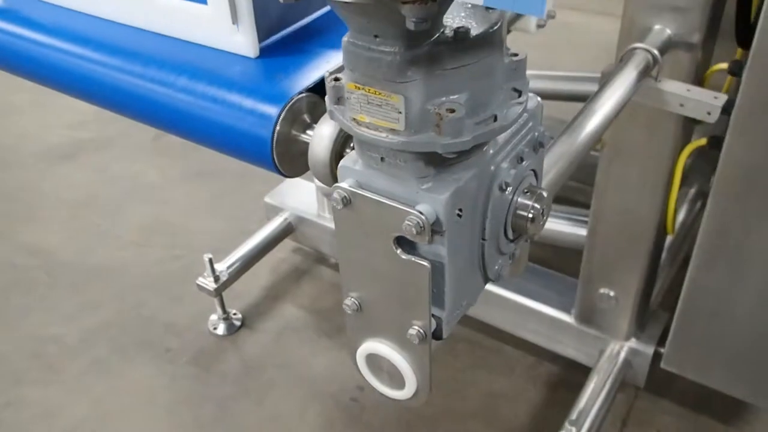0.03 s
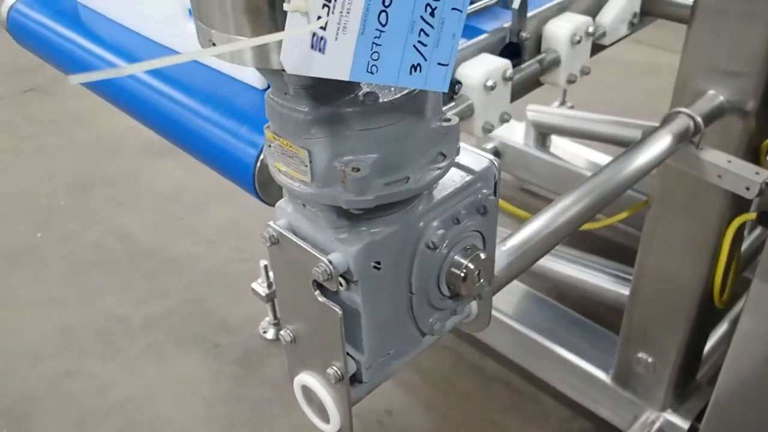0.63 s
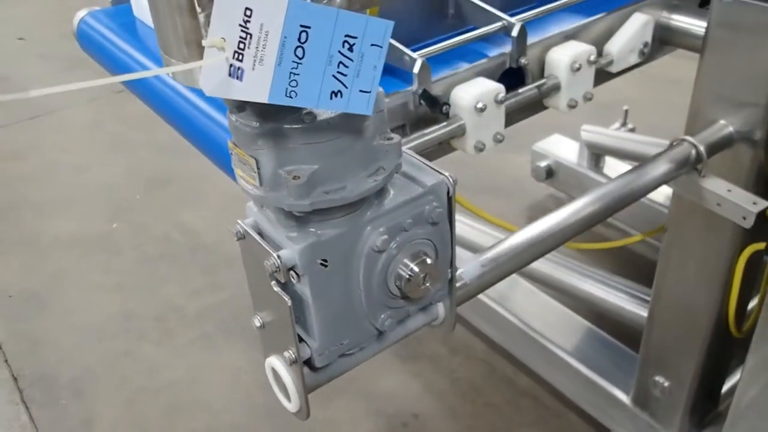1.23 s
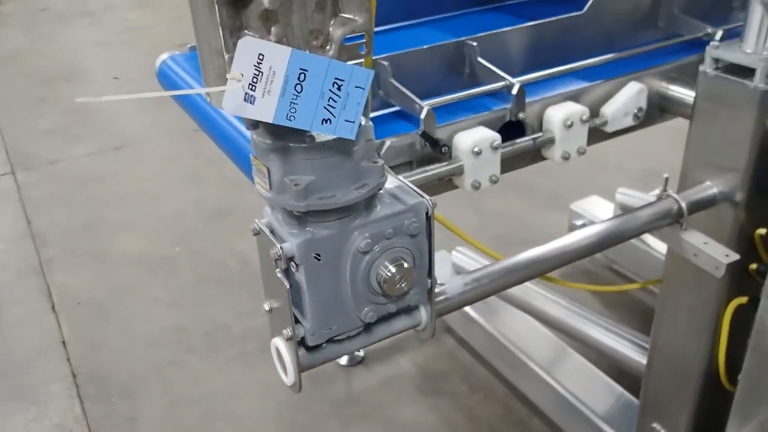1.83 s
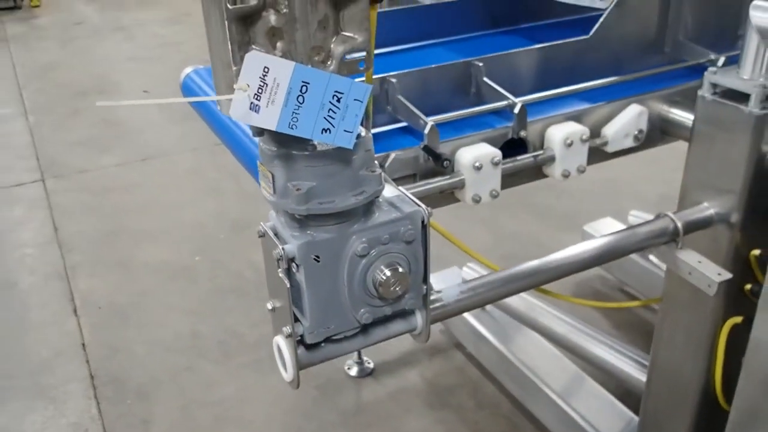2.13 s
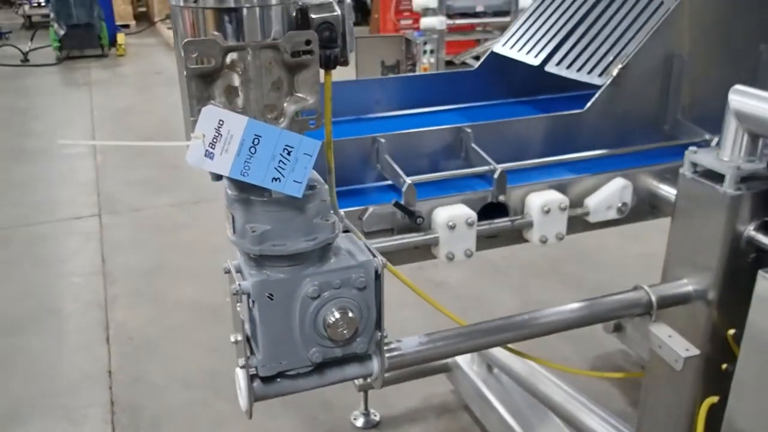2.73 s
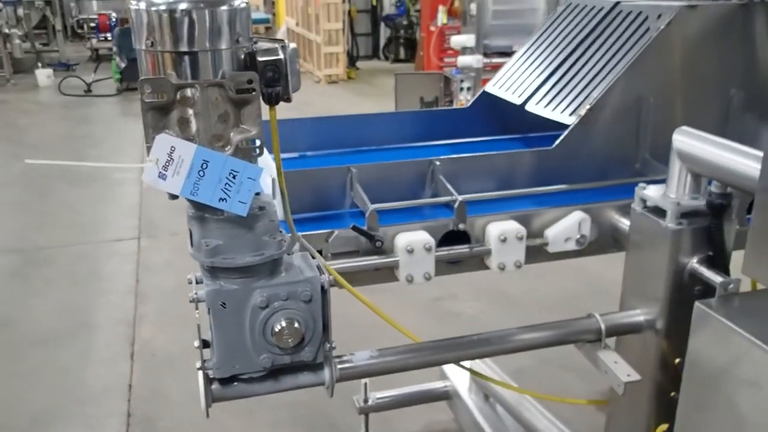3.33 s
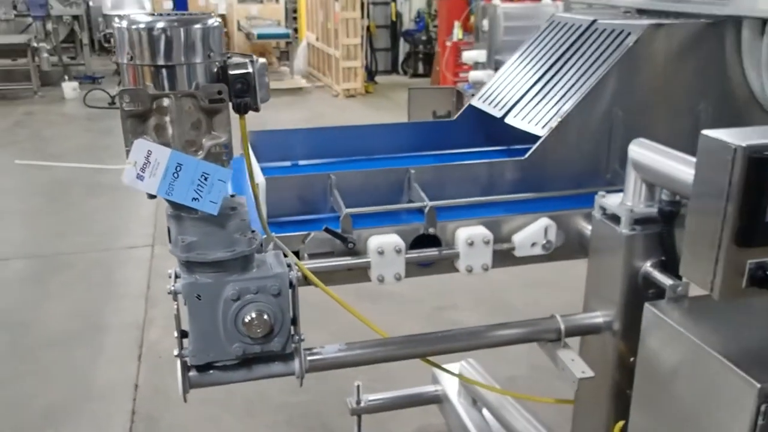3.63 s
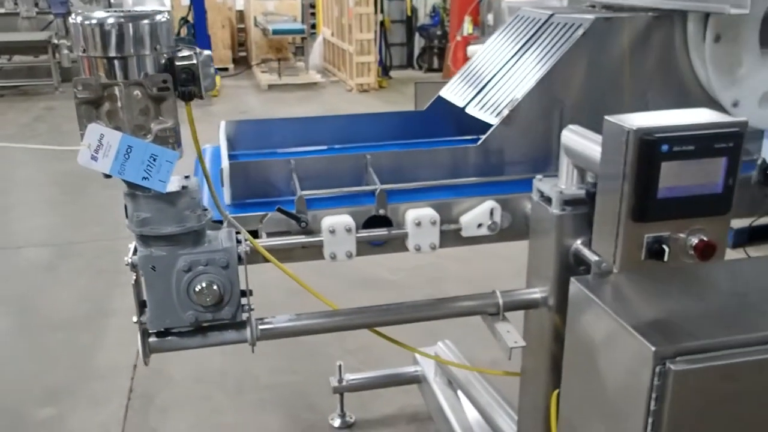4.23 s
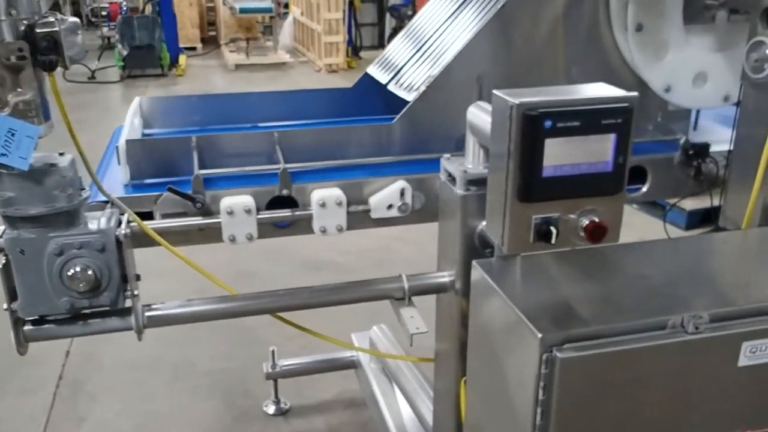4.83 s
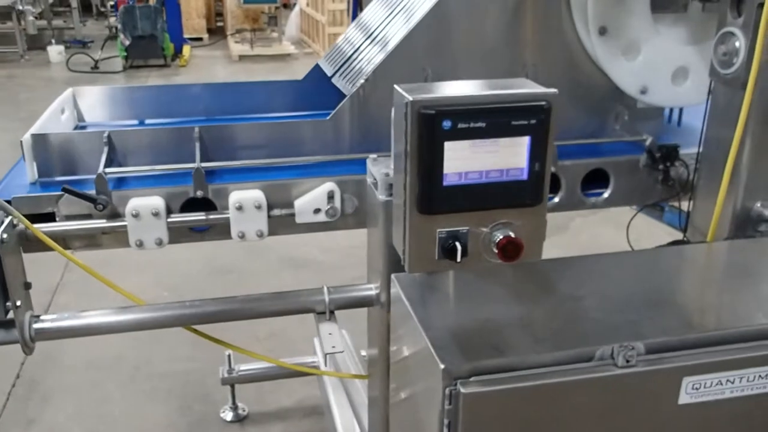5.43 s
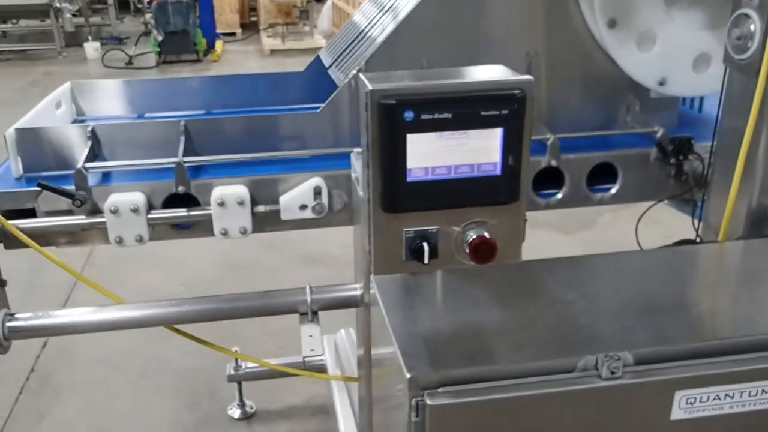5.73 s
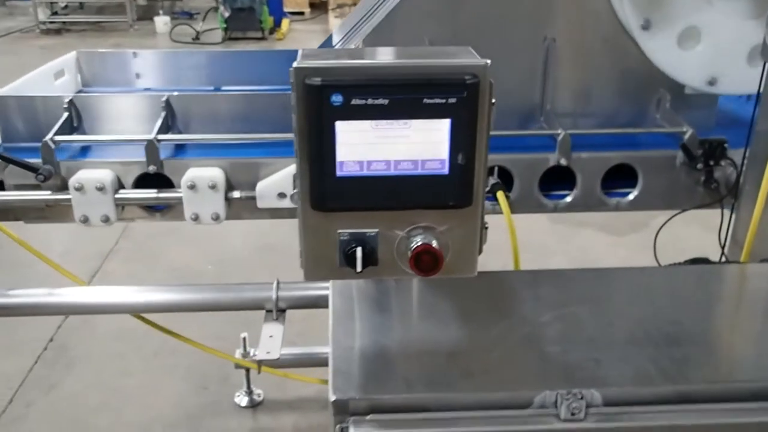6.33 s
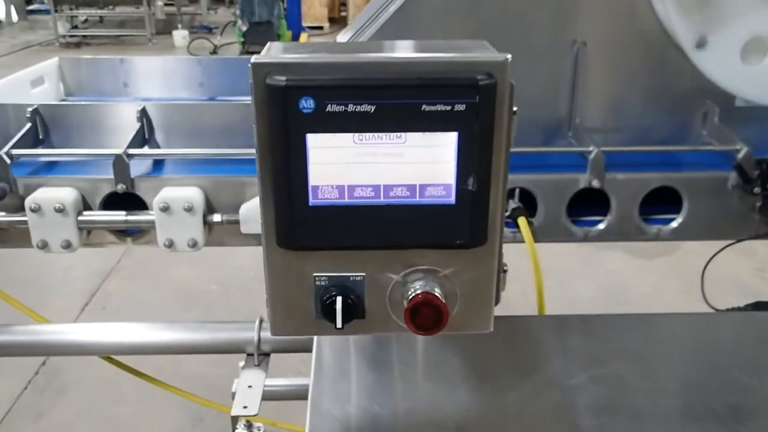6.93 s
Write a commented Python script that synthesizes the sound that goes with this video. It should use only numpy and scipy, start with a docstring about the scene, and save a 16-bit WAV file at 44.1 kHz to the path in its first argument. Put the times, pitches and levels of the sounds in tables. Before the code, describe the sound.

A conveyor runs steadily in a warehouse. Its gear motor gives a low hum and rumble, a rhythmic churn and rattle, a thin high whine and a soft fan hiss, while a bearing squeals faintly. The hand-held stereo microphone starts close and backs away, so the whine and rattle ease while the hum carries on. The belt softly brushes its guide three times, and a finger briefly scuffs the microphone.

```python
"""A warehouse, beside a running conveyor: a hand-held stereo microphone backs from 0.37 m to about 1 m
off the gear motor and turns away. The inverter makes the windings whine near 8 kHz, shafts hum, the
gearing churns and rattles with every turn, a bearing sings, the fan hisses and loose fittings buzz.
The belt brushes a guide once per turn of its roller; a finger scuffs the recorder. Distance fades the
whine and the rattle; the hum swells and sinks with the standing waves of the hall."""
import sys
import numpy as np
from scipy import signal
from scipy.fft import rfft, irfft
from scipy.io import wavfile
from scipy.ndimage import map_coordinates

SR = 44100
rng = np.random.default_rng(int(sys.argv[2]) if len(sys.argv) > 2 else 0)


def log_audio(samples):
    """Write samples as a 16-bit WAV file to the path given in sys.argv[1]."""
    # one column per channel
    frames = np.atleast_2d(samples).T
    # limit to full scale, then quantise
    limited = np.clip(frames, -1, 1)
    pcm = np.round(limited * 32767).astype(np.int16)
    wavfile.write(sys.argv[1], SR, pcm)


N = 311787
T = np.arange(N) / SR
TURN_HZ = 4.385  # turns of the gearing per second


def from_db(db):
    """Decibels to gain."""
    return 10 ** (np.asarray(db) / 20)


def unit(x):
    """Scales to rms 1."""
    return x / np.sqrt(np.mean(abs(x) ** 2) + 1e-20)


def curve(rows, t=T):
    """Joins (time, value) rows with straight lines."""
    return np.interp(t, *np.transpose(rows))


def over_hz(points):
    """A short spectrum read at every FFT bin."""
    hz, value = np.transpose(points)
    return np.interp(np.log(np.fft.rfftfreq(N, 1 / SR) + 1), np.log(hz), value)


def drift(rate_hz):
    """A smooth random wander of rms 1."""
    steps = rng.standard_normal(400)
    places = np.linspace(0, 14 * rate_hz, N // 100 + 1)
    return unit(map_coordinates(steps, [places], mode="wrap"))[np.arange(N) // 100]


def tone(hz, rough, waver_hz, wander_hz=0):
    """A sine whose strength and phase waver and whose pitch may wander."""
    waver = 1 + rough * (drift(waver_hz) + 1j * drift(waver_hz))
    turns = np.cumsum(hz + wander_hz * drift(waver_hz)) / SR
    return unit((waver * np.exp(2j * np.pi * (turns + rng.random()))).real)


# How alike the two capsules hear the hall: f/Hz, likeness/0-1
STEREO_LIKENESS = [(50, 0.94), (150, 0.97), (280, 1), (550, 0.97), (900, .99), (2000, .96), (3000, 0.98),
                   (6000, 0.59), (9000, 0.06), (15000, 0.22)]

def colour(x, spectrum):
    """Shapes an excitation to rms 1 across two capsules that differ more in the treble."""
    same = np.clip(over_hz(STEREO_LIKENESS), 0, 1)
    mid = rfft(unit(x)) * np.sqrt(1 + same)
    side = rfft(rng.standard_normal(N)) * np.sqrt(1 - same)
    return unit(irfft(np.array([mid + side, mid - side]) * from_db(over_hz(spectrum)), N))


def hiss(spectrum):
    """Coloured stereo noise."""
    return colour(rng.standard_normal(N), spectrum)


# The microphone's walk: t/s, speed away from the motor/(m/s)
WALK = [(0, 0.23), (.4, -0.077), (.8, 0.025), (1.2, .26), (1.55, 0.31), (2, 0.18), (2.4, 0.095), (3, 0.22),
        (3.55, .34), (4, 0.079), (4.5, -0.043), (5.1, -0.092), (5.8, 0.021), (6.4, -0.27), (7.07, -0.25)]

def receded_db(start_m=0.37):
    """The microphone's distance from the motor, in dB over its starting distance."""
    metres = start_m + np.cumsum(curve(WALK)) / SR
    return 20 * np.log10(np.maximum(metres / start_m, .5))


def heard_walking(hz, wet_db, start_turns, sway_m_s=.08, shimmer=0.55, slant_rad=0.2, count=10):
    """A high tone at the moving microphone: direct sound plus echoes, each with its own Doppler shift."""
    t = T[::100]
    away_m = np.cumsum(curve(WALK, t)) * t[1]
    phase_per_m = 2j * np.pi * hz / 343
    ahead, aside, phase, bearing = rng.uniform(-1, 1, (4, count, 1))
    echoes = np.exp(phase_per_m * (ahead * away_m + aside * sway_m_s * t) + 1j * np.pi * phase)
    wet = from_db(wet_db)
    pair = []
    for side in (-1, 1):
        direct = np.exp(-phase_per_m * away_m + 1j * side * slant_rad)  # reaches one capsule earlier
        room = (echoes * np.exp(side * 1.7j * bearing)).sum(0) / np.sqrt(count)
        scatter = shimmer * (drift(14) + 1j * drift(12))[::100]  # echoes off moving parts blur the line
        pair.append(direct + wet * (room + scatter))
    power = 1 + wet ** 2 * (1 + 2 * shimmer ** 2)
    pair = unit(np.array(pair) / np.sqrt(power))  # more echo leaves the mean level unchanged
    wave = np.exp(2j * np.pi * (hz * T + start_turns))
    return np.sqrt(2) * np.array([(np.interp(T, t, path) * wave).real for path in pair])


# A second inverter, farther off in the hall: f/Hz, level/dB
FAR_WHINE = [(7973, -47), (8036, -47.5), (8070, -55)]

def far_inverter():
    """Faint lines that arrive with about as much echo as direct sound."""
    return sum(from_db(db) * heard_walking(hz, wet_db=-3, start_turns=rng.random())
               for hz, db in FAR_WHINE)


# Four families of sidebands from the near motor, each a list of:
# multiple of the carrier, of the drive frequency, of the rotor slot rate, level in the family/dB
SIDEBANDS = [
    [(1, -3, 0, -11), (1, -1, 0, -9), (1, 1, 0, -12), (1, 3, 0, -3), (1, 5, 0, -8), (1, -1, 1, -15)],
    [(2, -6, 0, -26), (2, -4, 0, -17), (2, -2, 0, -7), (2, 0, 0, -3), (2, 2, 0, -6), (2, 4, 0, -18),
     (2, 6, 0, -29)],
    [(2, -2, -1, -13), (2, 0, -1, -6), (2, 2, -1, -2), (2, -2, 1, -4), (2, 0, 1, -7), (2, 2, 1, -13)],
    [(3, -1, -1, -11), (3, -9, 0, -17), (3, -3, 0, -7), (3, -1, 0, -12), (3, 1, 0, -12), (3, 3, 0, -3),
     (3, 9, 0, -15), (3, 1, 1, -13)],
]
# How each family carries to the microphone:
# starting level/dB, fall with distance (1 = free field), change when turned away/dB, flicker/dB
WHINE_CARRY = [(-53, 0.78, 3, 2.5), (-28.5, 0.87, -3, 1.4), (-43, 0.72, -5.5, 1.2), (-53, 0.66, -2.5, 0.8)]
# The microphone crosses each family's beam from the housing: t/s, half width/s, gain/dB
WHINE_BEAMS = [(0.71, 0.22, 6), (0.025, 0.28, 7), (.03, 0.31, 0.5), (0.61, 0.14, 3)]
# The microphone's aim: t/s, turned away from the motor/0-1
TURNED_AWAY = [(0, 0), (3.3, 0), (5.2, 0.8), (7.07, 0.74)]

def motor_whine(carrier_hz=4000, drive_hz=27, slot_hz=386.5, lag_turns=.09, flicker_hz=3.3):
    """The inverter's sidebands keep in step and pulse at twice the drive rate; slot lines run free."""
    away_db, turned = receded_db(), curve(TURNED_AWAY)
    wet_db = (-10 + .9 * away_db + 3 * turned)[::100]  # echoes gain on the direct sound
    out = 0
    for family, carry, (s, width_s, beam_db) in zip(SIDEBANDS, WHINE_CARRY, WHINE_BEAMS):
        near_db, fall, turned_db, flicker_db = carry
        start, lines = rng.random(), 0
        for carrier, drive, slot, db in family:
            hz = carrier * carrier_hz + drive * drive_hz + slot * slot_hz
            lag = lag_turns * (drive / 2) ** 2  # the housing delays outer sidebands: softer pulses
            lines += from_db(db) * heard_walking(hz, wet_db, start + lag + slot * rng.random())
        beam = beam_db * np.exp(-((T - s) / width_s) ** 2)
        level_db = near_db - fall * away_db + turned_db * turned + beam
        out += lines * from_db(level_db + flicker_db * drift(flicker_hz))
    return out


# Weaker shaft and gear tones, alike at every distance: f/Hz, level before trim/dB
GEAR_TONES = [(76.2, -67), (82.1, -54), (107, -48), (167.6, -47.5), (267.7, -45), (298.1, -54.5),
              (339.1, -50.5), (397, -48.5), (456.2, -68), (492.6, -49), (955.5, -51.5), (1139.9, -53.5),
              (1232.1, -48), (1333, -47.5)]

def gear_tones(trim_db=-1):
    """Shafts and gears add a bed of slowly wavering tones."""
    return sum(from_db(db + trim_db) * tone(hz, rough=.45, waver_hz=1.272) for hz, db in GEAR_TONES)


# The main shaft tones: f/Hz
SHAFT_HZ = [61.1, 91.6, 121.9, 183.2, 246.3, 263.1]
# Their standing waves along the walk: mean level/dB, swing/dB, antinode t/s, time between antinodes/s
STANDING_WAVES = [(-50, 6.5, 4.45, 9), (-51.5, 10, 5.64, 14), (-44, 5.5, 4.05, 12), (-44, 4, 3.3, 3.07),
                  (-45.5, 6, 2.64, 17), (-38, 2, 0.2, 4.64)]

def shaft_hum(beating_hz=183.2, beat_rate_hz=1.05, beat_depth=0.48, beat_peak_s=3.365):
    """Tones swell with their standing waves; one beats slowly, the top two throb together at 17 Hz."""
    beat = 1 + beat_depth * np.cos(2 * np.pi * beat_rate_hz * (T - beat_peak_s))
    out = 0
    for hz, (db, swing_db, antinode_s, period_s) in zip(SHAFT_HZ, STANDING_WAVES):
        level = from_db(db + swing_db * np.cos(2 * np.pi * (T - antinode_s) / period_s))
        out += level * (beat if hz == beating_hz else 1) * tone(hz, rough=.12, waver_hz=8)
    return out


def meshing(repeat):
    """Tooth roughness: a share of it comes round again with every turn."""
    one_turn = rng.standard_normal(round(SR / TURN_HZ))
    return np.sqrt(repeat) * np.resize(one_turn, N) + np.sqrt(1 - repeat) * rng.standard_normal(N)


# The frame's rumble and the teeth's churn, spread through the hall: f/Hz, relative level/dB
RUMBLE_SPECTRUM = [(20, -29), (45, -24), (70, -5), (95, -6), (140, -2.5), (230, 1), (330, -0.5), (420, -4),
                   (550, -11), (800, -12.5), (1500, -50), (3000, -72)]
CHURN_SPECTRUM = [(300, -12), (600, -5), (760, -3), (950, 5.5), (1070, 2.5), (1200, 6), (1420, 3),
                  (1550, 0), (1700, -4.5), (1930, -10.5), (2180, -8.5), (2450, -31), (3500, -41)]

def gearing(rumble_db=-35.5, sway_db=1.1, churn_db=-36, fall=0.34):
    """Meshing teeth shake the frame and churn; only the churn fades, gently, with distance."""
    rumble = from_db(rumble_db + sway_db * drift(1.96)) * colour(meshing(repeat=0.34), RUMBLE_SPECTRUM)
    churn = from_db(churn_db - fall * receded_db()) * colour(meshing(repeat=0.38), CHURN_SPECTRUM)
    return rumble + churn


def each_turn(spots, rough, wander_hz=0):
    """Short swells of ringing at set places in the turn."""
    out = 0
    for place, length_s, hz, db in spots:
        from_peak_s = ((T * TURN_HZ - place + .5) % 1 - .5) / TURN_HZ
        swell = np.cos(np.pi * np.clip(from_peak_s / length_s, -.5, .5))
        out += from_db(db) * swell * tone(hz, rough, waver_hz=1 / length_s, wander_hz=wander_hz)
    return out


# The bearing's notes: place in the turn/0-1, length/s, f/Hz, relative level/dB
BEARING_NOTES = [(.06, .075, 2026, -1), (.345, .085, 2028, 3), (.6, .085, 2024, 3), (.8, .075, 2026, 0),
                 (.68, .11, 1143, 0)]
# The bearing at the microphone, slightly right: t/s, level before trim/dB
BEARING_LEVEL = [(0.05, -55.5), (1.02, -49.5), (1.46, -52), (3.55, -49.5), (5.24, -52.5), (6.17, -65),
                 (6.38, -57.5), (7.0, -62)]

def bearing_squeal(trim_db=4, throbs_per_turn=7):
    """A bearing sings four times a turn near 2 kHz, and once lower."""
    level = from_db(trim_db + curve(BEARING_LEVEL))
    throb = 1 + .4 * np.cos(2 * np.pi * throbs_per_turn * (TURN_HZ * T - .615))
    notes = each_turn(BEARING_NOTES, rough=0.32, wander_hz=2.63)
    return level * throb * notes * from_db([[-.7], [.7]])


# Hall resonances along the walk: t/s, half width/s, f/Hz, bandwidth/Hz, level/dB
HALL_BOOMS = [(.5, 0.54, 306, 106, -43.5), (2.45, 0.12, 180, 22, -42.5), (2.8, 0.17, 357, 62, -37.5),
              (6.88, .27, 516, 170, -42)]

def hall_booms():
    """Rumble swells as the microphone passes through single resonances of the hall."""
    out = 0
    for s, width_s, hz, width_hz, db in HALL_BOOMS:
        band = [(hz * np.exp(k * width_hz / hz), -12 * k ** 2) for k in np.linspace(-3, 3, 13)]
        out += from_db(db) * np.exp(-((T - s) / width_s) ** 2) * hiss(band)
    return out


def backlash(depth):
    """Quick pulses from the play between teeth, locked to the turn."""
    per_turn = np.array([[7], [8], [11], [20]])
    cycles = per_turn * TURN_HZ * T + rng.random(per_turn.shape)
    return unit(np.exp(depth * np.cos(2 * np.pi * cycles).sum(0)))


# The rattle close to the gearbox housing: f/Hz, relative level/dB
RATTLE_SPECTRUM = [(400, -9), (490, 2.5), (580, -38), (765, 2), (840, -18.5), (950, -2), (1080, -13),
                   (1330, 0), (1460, 1), (1560, -18), (1680, -8), (1900, -18), (2130, -12), (2400, -43.5),
                   (2750, -19.5), (3500, -93)]
# Tight spots in the gearing: place in the turn/0-1, length/s, f/Hz, close level before trim/dB
TIGHT_SPOTS = [(0.015, 0.028, 1430, -36.5), (.3, 0.028, 1350, -37), (0.58, 0.032, 1519, -35.5),
               (0.65, 0.08, 1144, -42), (0.74, 0.026, 1510, -38.5), (0.843, 0.024, 1359, -33),
               (.96, 0.22, 696, -45), (0.48, 0.22, 759.6, -43.5)]

def gearbox(rattle_db=-38, ring_trim_db=2, fall=1.2):
    """Backlash rattles and tight spots ring; both fade quickly with distance."""
    rattle = from_db(rattle_db) * backlash(depth=.45) * colour(meshing(repeat=.7), RATTLE_SPECTRUM)
    rings = from_db(ring_trim_db) * each_turn(TIGHT_SPOTS, rough=.45)
    return from_db(-fall * receded_db()) * (rattle + rings) * from_db([[-.3], [.3]])


# Loose fittings on the gearbox: f/Hz, relative level/dB
FITTINGS_SPECTRUM = [(2000, 6), (3200, -4), (4500, -10), (5250, 2), (5550, 11), (5800, 3), (6150, 4),
                     (6600, 4), (7200, 3), (9000, -11), (10500, -82), (16000, -43)]
# Their buzz, then their single ticks, at the microphone: t/s, level/dB
BUZZ_LEVEL = [(0, -50), (.8, -44.5), (1.1, -55), (2.5, -55.5), (7.07, -56.5)]
TICKS = [(0.123, -43), (0.319, -48), (.353, -38), (.483, -66), (.581, -45), (1.268, -45), (2.86, -45),
         (5.69, -49)]

def loose_fittings(tick_t60_s=0.14):
    """Loose metal parts buzz with the gearbox and now and then tick."""
    level = from_db(curve(BUZZ_LEVEL)) * backlash(depth=0.18)
    for s, db in TICKS:
        level += from_db(db - 60 * abs(T - s) / tick_t60_s) * (T >= s)
    return level * hiss(FITTINGS_SPECTRUM)


# The motor fan's hiss: f/Hz, relative level/dB
FAN_SPECTRUM = [(1000, 9.5), (2400, -7.5), (2800, -0.5), (3300, -4), (4100, 2.5), (5000, -0.5), (5600, 0.5),
                (7200, 3), (8200, 8), (9300, 1), (10400, -12), (12000, -14), (13000, -10), (16000, -11)]
# The fan at the microphone: t/s, level/dB
FAN_LEVEL = [(0, -43), (.7, -45.5), (1.1, -43), (2.3, -45), (3.8, -45.5), (4.8, -44.5), (7.07, -44)]

def fan(flicker_db=1.0):
    """Air hisses through the motor's cowl."""
    return from_db(curve(FAN_LEVEL) + flicker_db * drift(22)) * hiss(FAN_SPECTRUM)


# The belt against its guide: f/Hz, relative level/dB
BRUSH_SPECTRUM = [(1000, -7), (3300, -11.5), (4200, -3), (4500, -7.5), (5000, 3.5), (5350, -6), (5740, 7),
                  (6000, 3.5), (7500, 4), (8700, 6.5), (9700, -2.5), (10400, -49), (13000, -21),
                  (16000, -34)]
# Each brush at the microphone: start t/s, length/s, level at its middle/dB
BELT_BRUSHES = [(1.377, 0.41, -36.7), (4.02, 0.41, -41), (6.649, 0.42, -41.5)]

def belt(rise_s=0.082, fall_s=0.097, shoulder_db=0.5):
    """The belt brushes its guide in soft, almost flat-topped swells."""
    level = 0
    for s, length_s, db in BELT_BRUSHES:
        edges = np.clip(np.minimum((T - s) / rise_s, (s + length_s - T) / fall_s), 0, 1)
        shoulders = shoulder_db * (1 - np.sin(np.pi * (T - s) / length_s))
        level += edges * from_db(db + shoulders)
    return level * hiss(BRUSH_SPECTRUM)


# Snaps on the recorder's body, by the right capsule: t/s, relative height
BODY_SNAPS = [(2.1921, .16), (2.1944, .36)]

def handling(scuff_s=2.21, half_length_s=0.015, scuff_db=-35, left_db=-10, right_db=2):
    """Two dry snaps on the recorder's body, then the scuff of a finger."""
    swell = np.cos(np.pi / 2 * np.clip((T - scuff_s) / half_length_s, -1, 1))
    out = from_db(scuff_db) * swell * hiss([(500, -4), (3000, 1), (9000, 2), (16000, -5)])
    snap = np.array([.12, .3, -1, .3, .18, .1])
    for s, height in BODY_SNAPS:
        start = round(s * SR)
        out[:, start:start + len(snap)] += height * snap
    return out * from_db([[left_db], [right_db]])


def scene():
    """The whole conveyor at the stereo microphone."""
    tones = far_inverter() + motor_whine() + gear_tones() + shaft_hum()
    gears = gearing() + bearing_squeal() + hall_booms() + gearbox() + loose_fittings()
    return tones + gears + fan() + belt() + handling()


def record(dry):
    """The recorder cuts the treble above 15.75 kHz."""
    lowpass = signal.firwin(511, 15750, window=("kaiser", 9), fs=SR)
    return signal.oaconvolve(dry, lowpass[None], "same")


dry = scene()
out = record(dry)
log_audio(out)
```